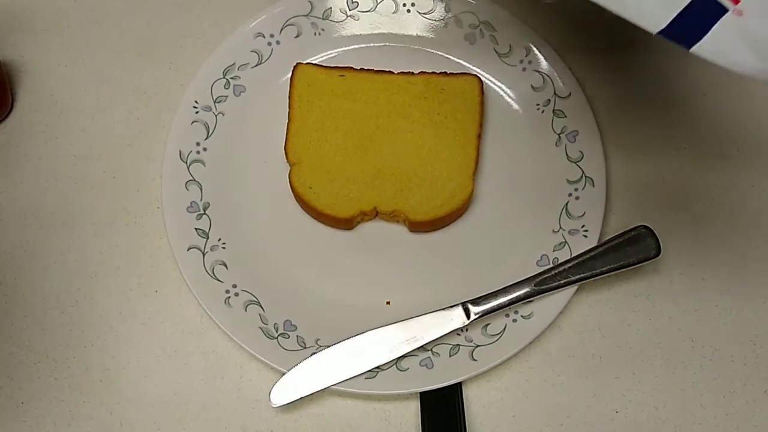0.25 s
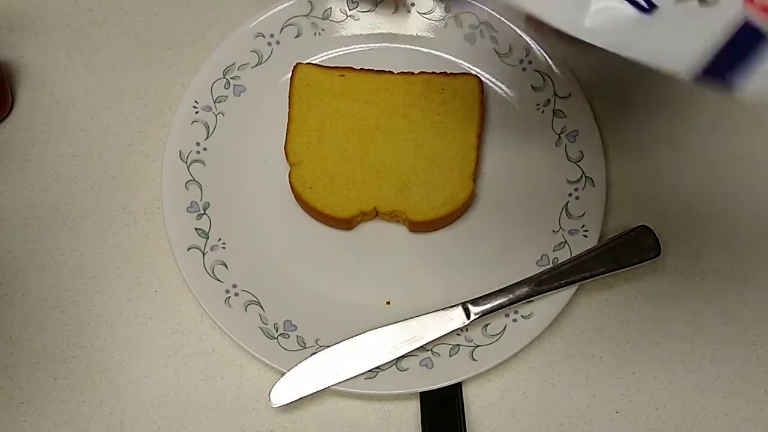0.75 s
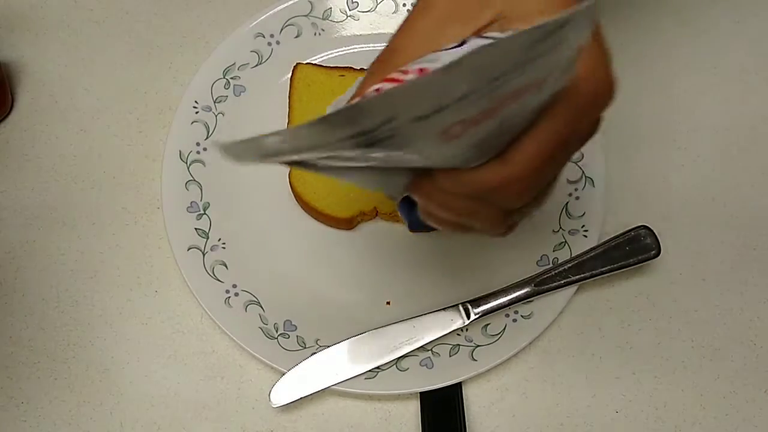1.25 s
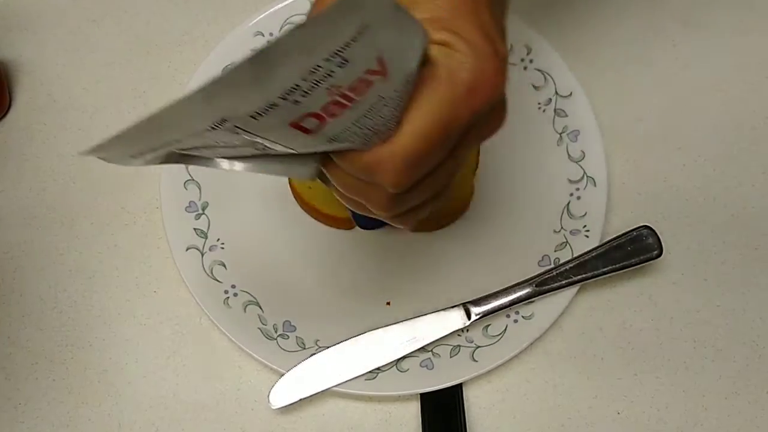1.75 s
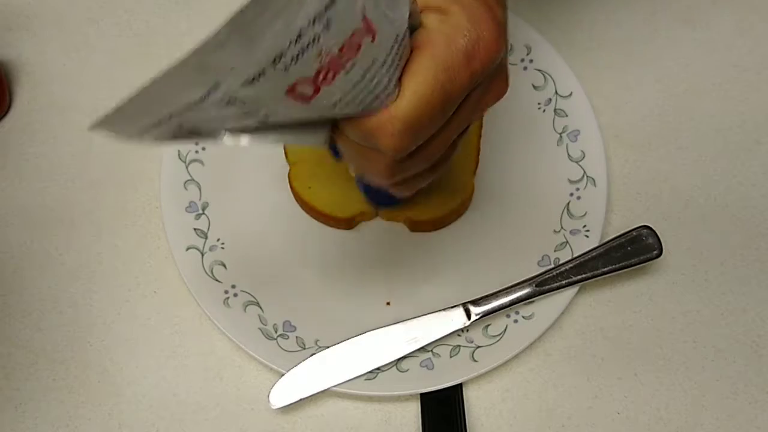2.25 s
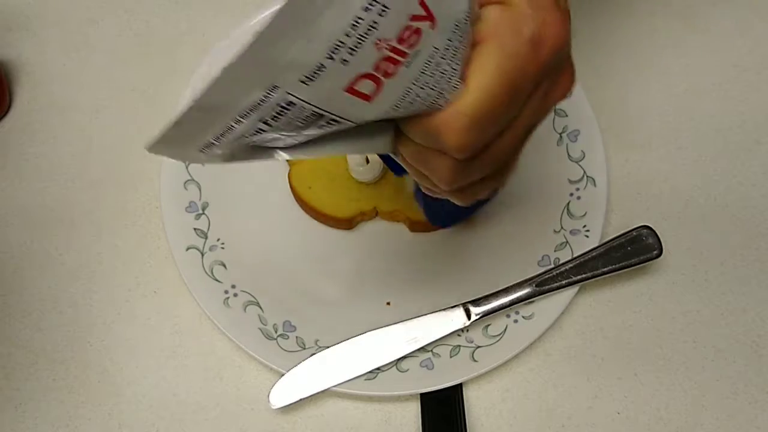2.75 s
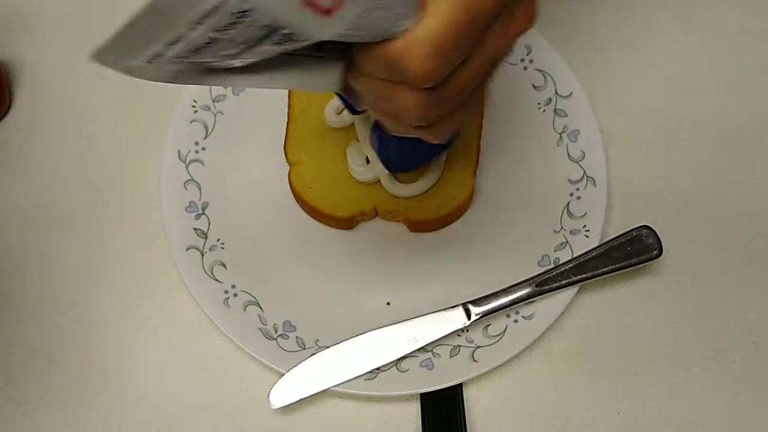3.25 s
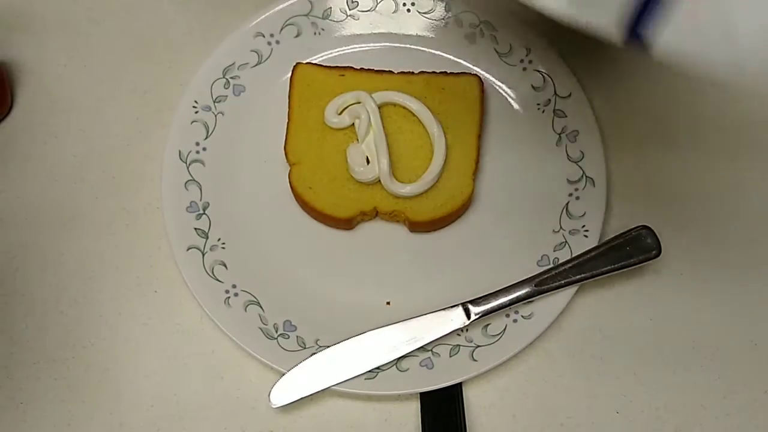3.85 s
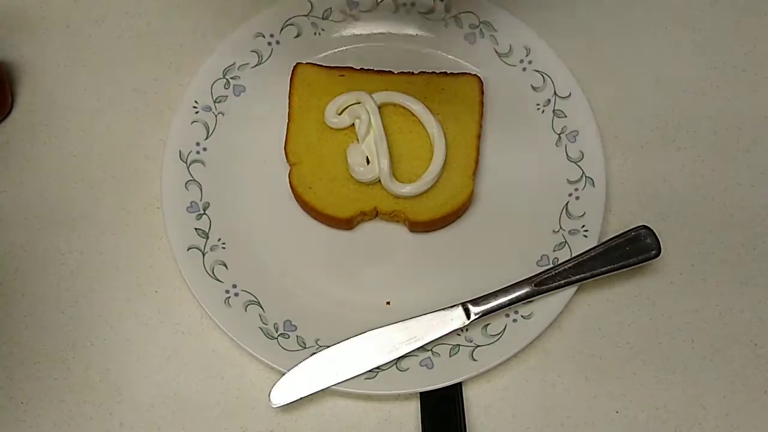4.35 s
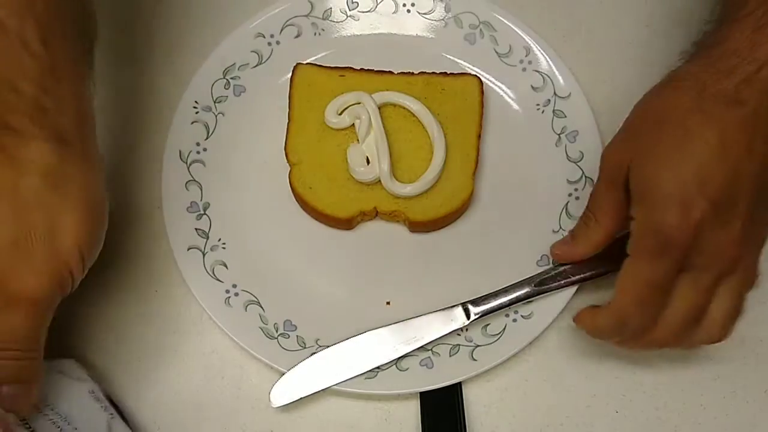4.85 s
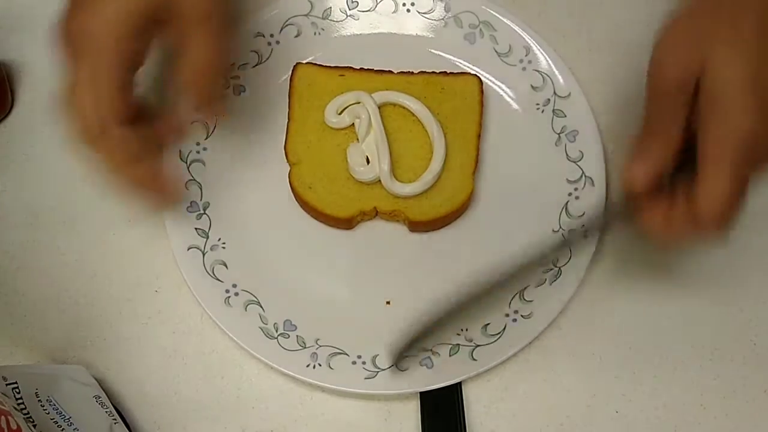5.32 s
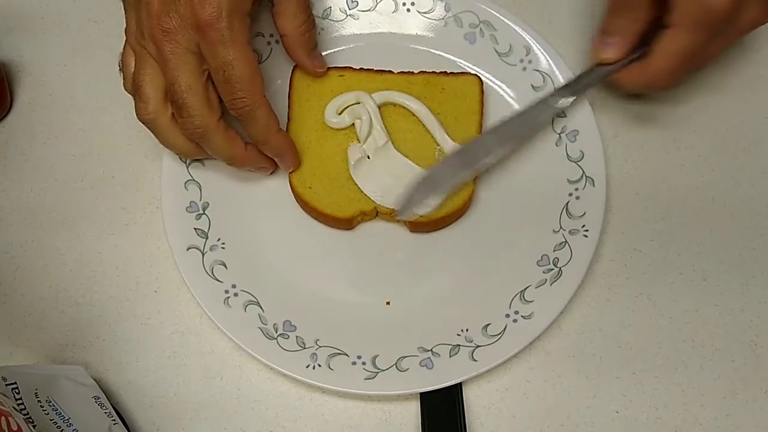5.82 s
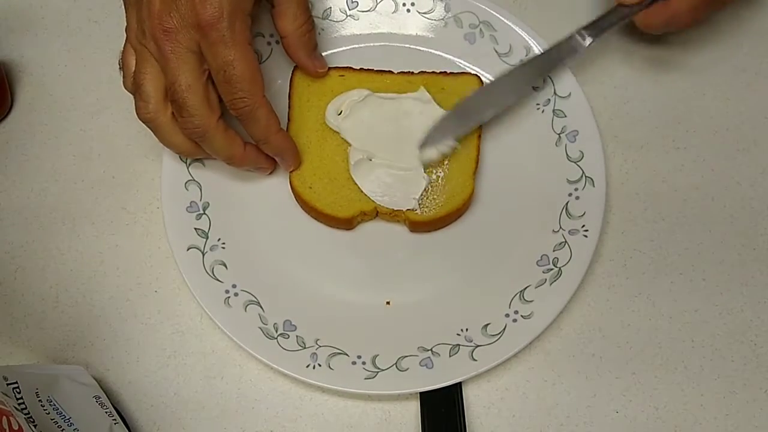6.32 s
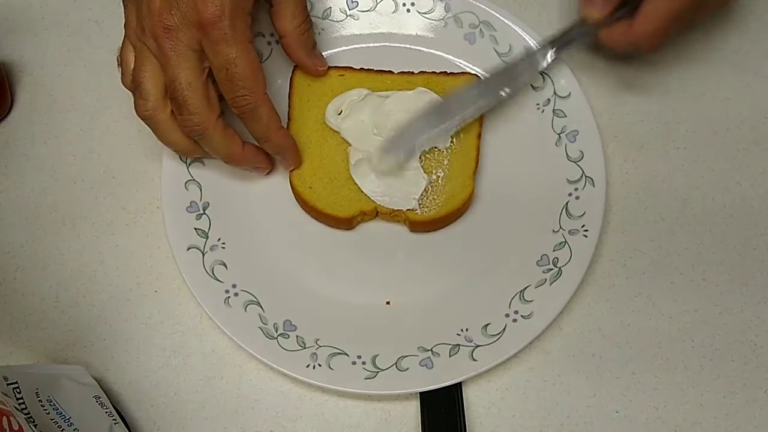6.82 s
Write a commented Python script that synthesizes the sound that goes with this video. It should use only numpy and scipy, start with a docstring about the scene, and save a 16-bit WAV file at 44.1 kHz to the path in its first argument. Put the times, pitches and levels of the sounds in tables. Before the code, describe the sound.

A stiff foil pouch snaps and crackles up close, lands with a double knock on a table, then a knife scrapes briefly off a plate.

```python
"""Foil pouch and knife in a small kitchen

Sour cream is squeezed from a stiff foil pouch onto bread on a plate, close to the microphone.
The pouch snaps, ticks and knocks on the table: clicked resonances, noise cracks and a thud, smeared in time.
Its rustle is grainy noise in three bands; soft bumps click two dull table modes.
A steel knife slid off the plate's rim is rough noise through resonances of blade and plate.
A noise-built room answer, shaped air noise and a faint hum of wavering sines surround them."""
import sys
import numpy as np
from scipy import signal
from scipy.fft import rfft, irfft
from scipy.io import wavfile
from scipy.ndimage import uniform_filter1d, minimum_filter1d

SR = 44100
rng = np.random.default_rng(int(sys.argv[2]) if len(sys.argv) > 2 else 0)


def int16_out(signal):
    """Quantize to a 16-bit WAV file."""
    q = np.round(np.clip(np.atleast_2d(signal).T, -1, 1) * 32767)
    wavfile.write(sys.argv[1], SR, q.astype(np.int16))


N = 312327
TIME = np.arange(N) / SR
FOIL_WIDTH_HZ = 360   # bandwidth of a foil resonance at 1 kHz, for each of its two passes


def from_db(db):
    """Turns decibels into an amplitude factor."""
    return 10 ** (np.asarray(db) / 20)


def rms_one(x):
    """Scales a signal to an RMS of 1."""
    return x / np.sqrt(np.mean(x ** 2) + 1e-20)


def at_hz(points, hz, axis=1):
    """Reads a column of a table on a log-frequency axis."""
    points = np.array(points)
    return np.interp(np.log(hz), np.log(points[:, 0]), points[:, axis])


def butter(x, hz, kind, order=2):
    """Causal Butterworth filter."""
    safe_hz = np.clip(hz, 10, .47 * SR)
    return signal.sosfilt(signal.butter(order, safe_hz, kind, fs=SR, output="sos"), x)


def resonate(x, hz, width_hz):
    """One resonance with gain 1 on top."""
    radius = np.exp(-np.pi * width_hz / SR)
    feed = np.array([1, 0, -1]) * (1 - radius * radius) / 2
    feedback = [1, -2 * radius * np.cos(2 * np.pi * hz / SR), radius * radius]
    return signal.lfilter(feed, feedback, x + 1e-18)


def swell(x, hz, width_hz):
    """A resonance passed twice: it builds up over a few cycles and has steep skirts."""
    return resonate(resonate(x, hz, width_hz), hz, width_hz)


def drift(rate):
    """A random line through `rate` knots per second, with an RMS of 1."""
    knots = rng.standard_normal(int(N / SR * rate) + 2)
    return rms_one(np.interp(TIME * rate, np.arange(len(knots)), knots))


def add(track, sound, s):
    """Mixes a sound into a track from time s."""
    start = max(round(s * SR), 0)
    track[..., start:start + sound.shape[-1]] += sound[..., :N - start]


def port_noise(size):
    """White noise from all sides as the two microphone ports hear it, more or less alike by frequency."""
    # left-right likeness of the two ports: (frequency [Hz], correlation [held to -1..1 when used])
    likeness = [(60, .2), (200, -0.27), (600, 0.6), (1100, 0.99), (1600, .25), (2000, -.55), (2230, -1.4),
                (2550, 0.086), (3200, 0.95), (3900, 0.26), (4450, -1.4), (5400, 0.67), (6700, -0.46),
                (8000, -0.045)]
    hz = np.arange(size // 2 + 1) * SR / size + 1
    alike = np.clip(at_hz(likeness, hz), -1, 1)
    mid, side = rfft(rng.standard_normal((2, size)))
    spectrum = np.sqrt(1 + alike) * mid + np.sqrt(1 - alike) * side * [[1], [-1]]
    return irfft(spectrum, size) / np.sqrt(2)


def noise_bands(size):
    """Half-octave bands of stereo noise: (centre Hz, band)."""
    white = [port_noise(size), port_noise(size)]   # neighbouring bands share no noise
    edges = 22 * 2 ** np.arange(0, 10, .5)
    for k, (low, high) in enumerate(zip(edges, edges[1:])):
        yield np.sqrt(low * high), butter(white[k % 2], [low, high], "band", order=3)


def snaps(thud_over_crack_db=10):
    """Panels buckle in the hand; the harder the crack, the more the filling thuds."""
    # a panel of the pouch buckles: (time [s], panel [Hz], panel [dB], overtone [dB], crease [Hz],
    # crease [dB], crack [dB], spread [ms], left over right [dB], room send [dB])
    panel_snaps = [ (0.5024, 687, 17, 20.5, 3600, 20.5, -16, .5, -2, -1.5),
                   (0.5031, 1330, 19, 25, 5240, 10, -9, 1.69, -4.5, 0),
                   (.565, 1590, 4.5, 18.5, 3196, 21, -5, 2.26, -1.5, 0.5),
                   (.5662, 600, 0, 0.5, 5500, 6.5, -9, 1.93, 2.5, 2.5),
                   (.922, 669, 0.5, 13, 3310, 0, -32, 0.76, 4, -4.5),
                   (1.0383, 604, 11, 16.5, 3060, -5.5, -13, 1.86, 2.9, -3),
                   (1.0432, 912, 12.5, 15.5, 2910, 6.5, -17, 1.38, 1.2, -5.5),
                   (1.7973, 1515, .5, -5, 3430, -4, -25, 0.54, 1.43, -5.5),
                   (3.610, 711.4, 15.5, 23, 2938, 10.5, -9, 0.27, 0.9, -6),
                   (4.0063, 1360, 8, 16.5, 3610, 14.5, -13.5, 1.15, 3, -2),
                   (4.0145, 1600, -5, 12, 5410, 4, -29, 0.86, 2.7, -14)]
    out = np.zeros((3, N))
    for s, *foil, crack_db, spread_ms, pan_db, room_db in panel_snaps:
        parts = buckle(*foil, crack_db, crack_db + thud_over_crack_db, FOIL_WIDTH_HZ)
        out += radiate(parts, s, spread_ms, pan_db, room_db)
    return out


def knocks(spread_ms=0.69):
    """The pouch lands: the same foil sounds over a heavy thud of the filling."""
    # the pouch lands on the table: (time [s], thud [dB], panel [Hz], panel [dB], overtone [dB],
    # crease [Hz], crease [dB], crack [dB], left over right [dB], room send [dB])
    landings = [ (4.038, 17, 794, 19.2, 19, 2460, -10.5, -13, 3, -6),
                (4.070, 15.5, 904, 15, 9, 3400, -2, -16, 4.5, -7),
                (5.0037, 16.5, 800, 17, -16, 2757, 20.5, -4, 9, 2),
                (5.005, 8, 385, 16.5, 7.5, 3820, 17, -22, 7, -0.5)]
    out = np.zeros((3, N))
    for s, thud_db, *foil, pan_db, room_db in landings:
        out += radiate(buckle(*foil, thud_db, FOIL_WIDTH_HZ), s, spread_ms, pan_db, room_db)
    return out


def ticks(crease_hz=3280, width_hz=560, spread_ms=.7):
    """Small creases, damped by the fingers, differ in strength, pitch and brightness."""
    # a small crease ticks: (time [s], panel [dB], panel [Hz], brightness: crease over panel [dB])
    small_creases = [(0.0516, -7, 656, -14), (.487, -16.5, 700, -8.5), (0.9183, 0, 700, -9),
                     (1.0035, -10.5, 672, -24), (1.1851, 0, 746, -16.5), (1.238, -14.5, 704, -15),
                     (1.295, -20, 818, -8.5), (1.676, -24.5, 798, -10), (2.409, -23.5, 650, -29),
                     (2.773, -36.5, 1604, 5), (3.367, -35, 1600, 3.5), (3.902, -21.5, 778, -29),
                     (3.9312, -15, 1130, -6.5), (4.0636, -22, 900, 2), (4.096, -7.5, 1380, 1),
                     (4.112, -17, 800, -6), (5.085, -5, 800, 0.5), (5.9, -35.5, 1710, 7),
                     (6.128, -17.5, 720, -16.5)]
    overtone_db, thud_db = -4, -16   # relative to the panel
    crack_db = -26   # relative to the crease
    room_db = 1.5   # relative to the whole tick
    out = np.zeros((3, N))
    for s, db, hz, bright_db in small_creases:
        crease_db = db + bright_db
        parts = buckle(hz, db, db + overtone_db, crease_hz, crease_db,
                       crease_db + crack_db, db + thud_db, width_hz)
        out += radiate(parts, s, spread_ms, 0, room_db)
    return out


def buckle(panel_hz, panel_db, overtone_db, crease_hz, crease_db, crack_db, thud_db, width_hz,
           thud_hz=260, thud_width_hz=240, overtone_ratio=1.78):
    """A panel rings with one overtone, its crease rings and cracks, the filling thuds; returns lows and highs."""
    t = np.arange(SR // 20) / SR
    click = signal.unit_impulse(len(t))

    def ring(hz, db):
        """Higher resonances are wider, so they die sooner."""
        return from_db(db) * swell(click, hz, width_hz * np.sqrt(hz / 1000))

    panel = ring(panel_hz, panel_db)
    overtone = ring(panel_hz * overtone_ratio, overtone_db)
    crease = ring(crease_hz, crease_db)
    thud = from_db(thud_db) * swell(click, thud_hz, thud_width_hz)
    return thud - panel, overtone - crease + from_db(crack_db) * crack(t)


def crack(t, decay_s=0.0028, bright_hz=5700, top_hz=12000, top_db=-1.0, body_db=10.0):
    """The crease gives way in a few milliseconds of tiny fractures, coarse and fine."""
    bursts = rng.standard_normal((2, len(t))) * np.exp(-t / decay_s)
    coarse, fine = bursts / np.linalg.norm(bursts, axis=1, keepdims=True)
    body = butter(coarse, [2400, bright_hz], "band")
    top = butter(butter(fine, 6900, "high", order=3), top_hz, "low", order=1)
    return from_db(body_db) * body + from_db(top_db) * top


def disperse(parts, spread_ms, step_hz=450):
    """Bending waves of different pitch take different times to cross the foil."""
    size = parts.shape[-1]
    hz = np.arange(size // 2 + 1) * SR / size
    travel = rng.uniform(0, 2, 200)   # one random travel time every step_hz, in units of the spread
    delay_s = spread_ms / 1000 * np.interp(hz / step_hz, np.arange(len(travel)), travel)
    phase = 2 * np.pi * np.cumsum(delay_s) * hz[1]   # delay summed over frequency gives phase
    return irfft(rfft(parts) * np.exp(-1j * phase), size)


def radiate(parts, s, spread_ms, pan_db, room_db, port_lag_ms=.21, sideways_db=5.5):
    """The whole pouch radiates the lows; the highs reach the louder side first. Gives left, right, room send."""
    out, size = np.zeros((3, N)), len(parts[0])
    padded = np.pad(parts, ((0, 0), (size, 0)))   # silence ahead leaves room for the smear
    body, crease = disperse(padded, spread_ms)
    start = s - size / SR
    # the lag between the ports nears its full size as the level difference passes sideways_db
    lead_s = port_lag_ms / 1000 * np.tanh(pan_db / sideways_db)
    for ear, side in zip(out, (.5, -.5)):
        add(ear, body, start)
        add(ear, crease * from_db(side * pan_db), start - side * lead_s)
    add(out[2], (body + crease) * from_db(room_db), start)
    return out


def rubbing(grain_db=-1.5, grain_rate=900, ticks_per_s=260, tick_db=-4):
    """Each rub swells and fades; tiny slips make its hiss grainy and creases tick in it."""
    # foil rubbing on skin and table: (time [s], half length [s], level before band offsets [dB], brightness [dB])
    rubs = [(.005, 0.012, -64, -9), (.086, 0.041, -68.5, -2.5), (0.171, 0.016, -68.5, 4),
            (0.28, 0.029, -70, -0.5), (0.675, 0.092, -75, -0.5), (0.837, .016, -65, -3.5),
            (1.933, 0.025, -65, -1), (1.992, 0.018, -57.5, 7), (3.397, .094, -77, 1),
            (4.06, 0.023, -49.5, -10), (4.295, 0.023, -71.5, 3.5), (4.493, 0.069, -65, 1.5),
            (4.536, 0.013, -48, 2), (4.563, 0.033, -67, 4.5), (5.038, 0.017, -55, -9),
            (5.246, 0.009, -53.5, 3)]
    # bands of the hiss: (low [Hz], high [Hz], offset [dB], share of the brightness [dB per dB])
    hiss_bands = [(397, 1800, -0.5, -1.3), (2680, 5300, 0.5, 0.098), (6700, 19000, -2.5, 0.96)]
    strikes = (rng.random(N) < ticks_per_s / SR) * rng.uniform(0.31, 1, N)
    creases = signal.lfilter([1], [1, -np.exp(-1 / (.0005 * SR))], strikes + 1e-18)   # 0.5 ms decay
    slips = rms_one(from_db(grain_db * drift(grain_rate)))
    grain = rms_one(slips + from_db(tick_db) * rms_one(creases))
    hiss = port_noise(N) * grain
    out = np.zeros((2, N))
    for low_hz, high_hz, band_db, share in hiss_bands:
        level = np.zeros(N)
        for s, half, db, bright_db in rubs:
            bell = np.exp(-.5 * np.minimum(((TIME - s) / half) ** 2, 100))
            level += from_db(db + band_db + share * bright_db) * bell
        out += level * rms_one(butter(hiss, [low_hz, high_hz], "band", order=3))
    return out


def knife(grain_db=1.5, friction_db=-26.0, pan_db=0.0):
    """Stick and slip on the rim drives the resonances of blade and plate."""
    # knife and plate resonances: (frequency [Hz], width [Hz], relative gain [dB])
    blade_modes = [(259.3, 150, 1), (660, 244, 0), (1840, 180, -6), (2846, 100, 0), (3540, 116, 2.5),
                   (4220, 310, -1), (5555, 41, 12.5), (6470, 150, -3), (7630, 220, -10), (8160, 260, -7.5),
                   (10050, 62, 0.5), (11100, 81, -5.5), (12600, 380, -4.5), (14920, 980, -7.5)]
    # the blade drags lightly over the rim, then scrapes as its tip slips off
    drag_start_s, drag_db, tip_s, tip_peak_db = 5.272, -66, 5.336, -37
    rise_db_per_s, fall_db_per_s = 998, 616
    # a shared part and a separate part for each ear
    noise = rng.standard_normal(N) + 0.93 * rng.standard_normal((2, N))
    slips = noise * from_db(grain_db * drift(900))
    ring = np.zeros((2, N))
    for k, (hz, width, db) in enumerate(blade_modes):
        ring += (-1) ** k * from_db(db) * resonate(slips, hz, width)
    friction = from_db(friction_db) * rms_one(butter(slips, 2200, "high"))
    onset_db = drag_db - rise_db_per_s * np.maximum(drag_start_s - TIME, 0)
    tip_db = tip_peak_db - rise_db_per_s * np.maximum(tip_s - TIME, 0)
    fall_db = fall_db_per_s * np.maximum(TIME - tip_s, 0)
    level = from_db(np.maximum(onset_db, tip_db) - fall_db) + 1e-18
    return level * (rms_one(ring) + friction) * from_db([[pan_db / 2], [-pan_db / 2]])


def table(low_hz=70, high_hz=135, low_db=4.0, high_db=9.0):
    """The table top answers a soft bump with two dull modes."""
    # soft bumps of hands and pouch on the table: (time [s], strength [dB])
    bumps = [(0.508, -14.5), (1.043, -7.5), (4.042, -4.5), (4.876, -17.5), (4.918, -16), (5.008, 3.5),
             (5.298, -23), (6.127, -17.5)]
    pushes = np.zeros(N)
    for s, db in bumps:
        add(pushes, from_db([db]), s)
    return from_db(low_db) * swell(pushes, low_hz, 40) + from_db(high_db) * swell(pushes, high_hz, 31)


def kitchen(x, build_s=0.0031):
    """Two near reflections and a diffuse tail that builds up fast and dies band by band."""
    # the kitchen's answer: (frequency [Hz], tail level [dB], time to fall by 60 dB [s])
    room_tail = [(120, -2, 0.56), (293.6, -6.5, 0.2), (680.3, -10.5, 0.17), (1397, -10, 0.2),
                 (2960, -10, 0.19), (6007, -10.5, 0.16), (13960, -10, 0.2)]
    # reflections off nearby surfaces: (delay [s], level [dB])
    reflections = [(.0092, -20), (0.0179, -30.5)]
    t = np.arange(SR // 2) / SR
    response = np.zeros((2, len(t)))
    for hz, band in noise_bands(len(t)):
        decay = from_db(-60 * t / at_hz(room_tail, hz, axis=2)) * (1 - np.exp(-t / build_s))
        response += from_db(at_hz(room_tail, hz)) * band * decay / np.linalg.norm(decay)
    for delay, db in reflections:
        response[:, round(delay * SR)] += from_db(db)
    return signal.fftconvolve(x[None], response, axes=1)[:, :N]


def background(air_db=-64, flicker_db=0.88, waver_db=2.5, wander=.9, hum_pan_db=11.0):
    """Moving air as shaped noise, and a wavering appliance hum from the left."""
    # colour of the room air: (frequency [Hz], relative level per Hz [dB])
    air_colour = [(22, -27), (50, -9.5), (85, -14.5), (120, -0.5), (220, -0.5), (320, -5), (450, -6),
                  (600, -4.5), (730, -13), (1200, -17.5), (2000, -22), (3500, -26.5), (6500, -32),
                  (15500, -32)]
    # appliance hum: (frequency [Hz], RMS level before wavering and panning [dB])
    hum_tones = [(193.8, -78), (236.9, -75), (296.1, -77.5), (371.4, -78), (479.1, -85), (570.6, -84)]
    colour = from_db(at_hz(air_colour, np.arange(N // 2 + 1) * SR / N + 1))
    air = rms_one(irfft(rfft(port_noise(N)) * colour, N)) * from_db(flicker_db * drift(23))
    hum = np.zeros(N)
    for hz, db in hum_tones:
        level = from_db(db + waver_db * drift(4)) * np.sqrt(2)
        hum += level * np.sin(2 * np.pi * hz * TIME + wander * drift(5.1))   # wander in radians
    air_sides = from_db(air_db) * air * from_db([[.7], [-.7]])
    return air_sides + hum * from_db([[hum_pan_db / 2], [-hum_pan_db / 2]])


def scene():
    """Pouch, knife and table close by, the kitchen around them."""
    pouch = snaps() + knocks() + ticks()
    direct, sent = pouch[:2], pouch[2]
    friction = rubbing() + knife()
    room = kitchen(sent + friction.mean(axis=0))
    return direct + friction + table() + room + background()


def record(dry, ceiling=1.0, cutoff_hz=15700):
    """A fast limiter holds the loudest peaks down and the top is cut."""
    gain = np.minimum(1, ceiling / (np.abs(dry).max(axis=0) + 1e-9))
    gain = uniform_filter1d(minimum_filter1d(gain, size=67), size=67)   # 1.5 ms windows
    return signal.sosfilt(signal.ellip(10, .2, 80, cutoff_hz, fs=SR, output="sos"), dry * gain)


dry = scene()
out = record(dry)
int16_out(out)
```